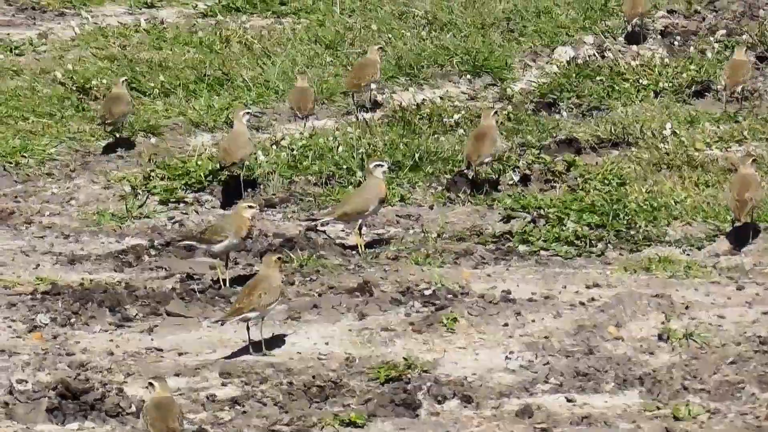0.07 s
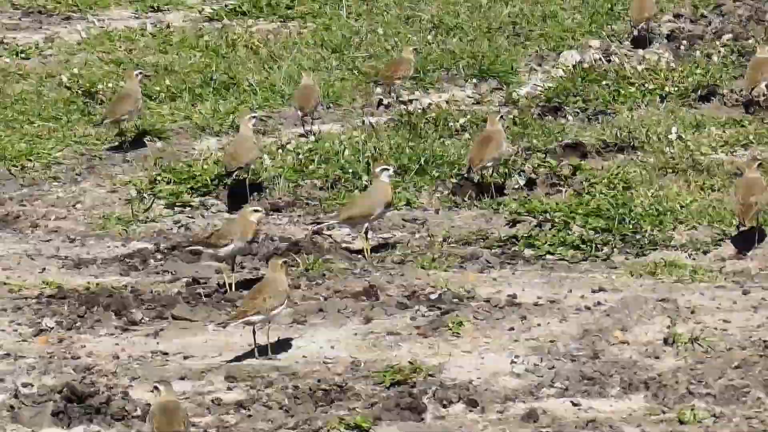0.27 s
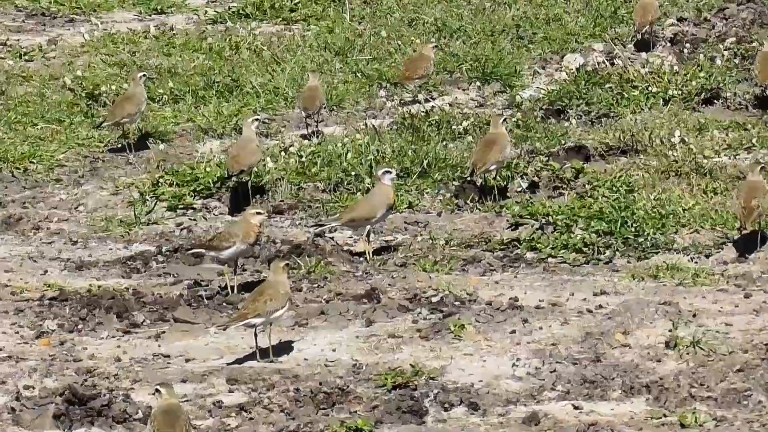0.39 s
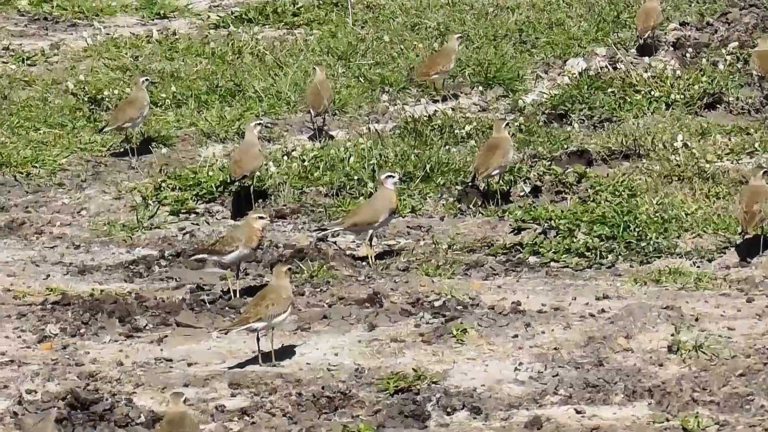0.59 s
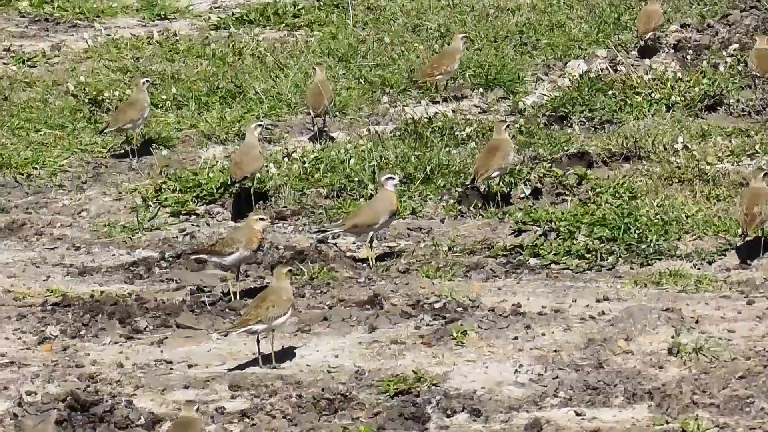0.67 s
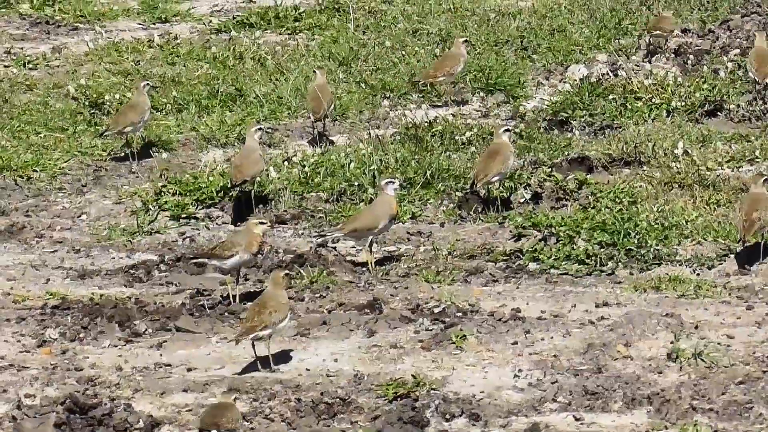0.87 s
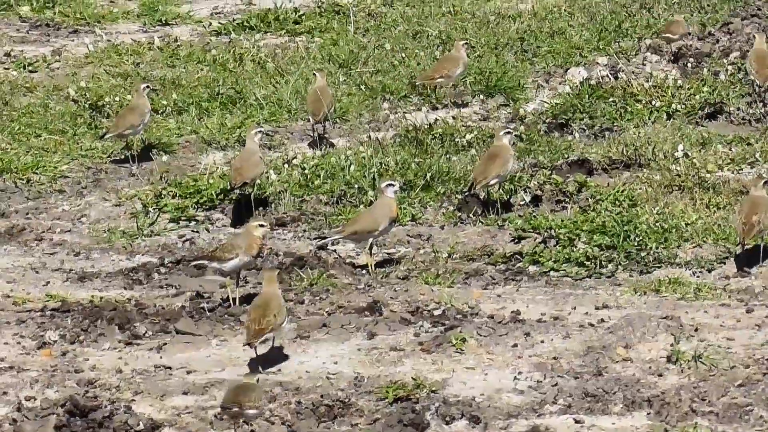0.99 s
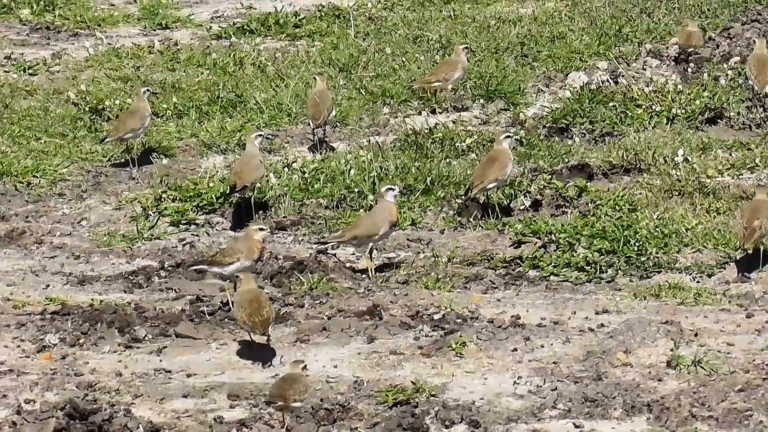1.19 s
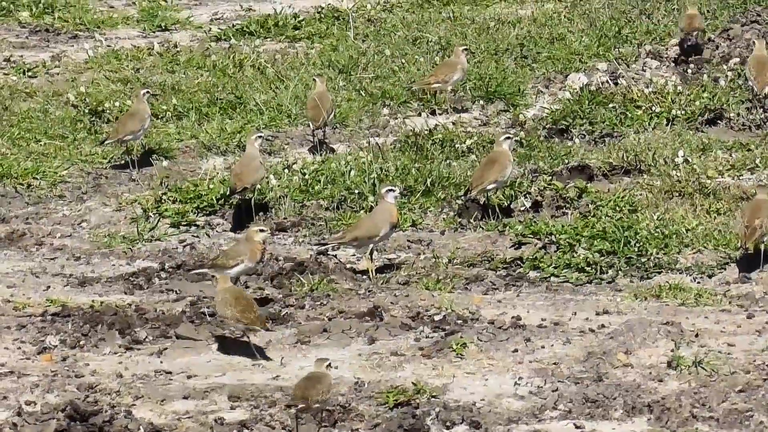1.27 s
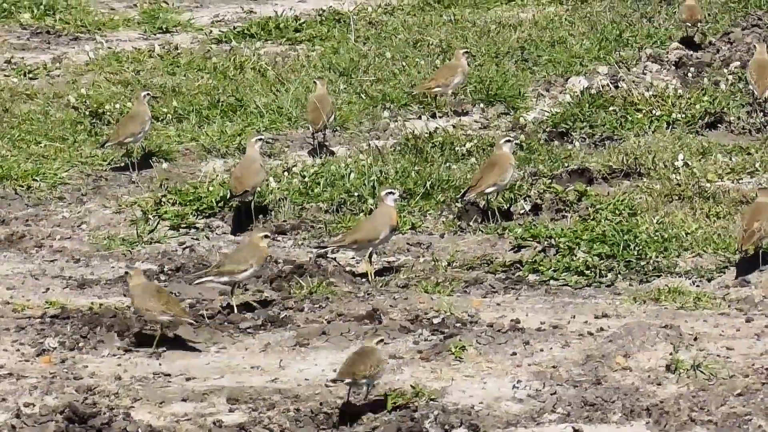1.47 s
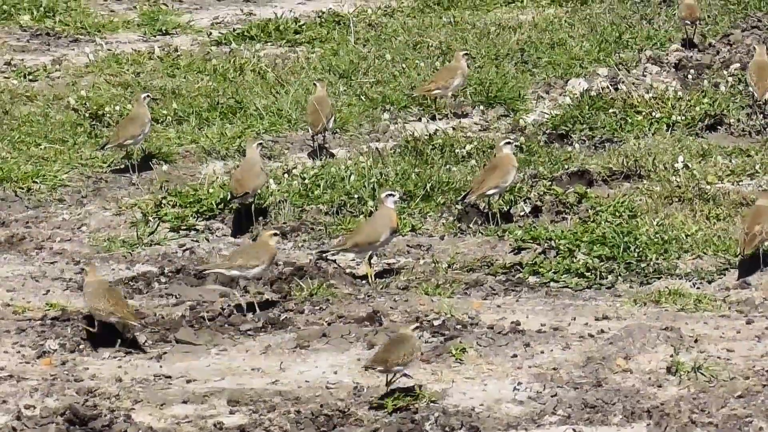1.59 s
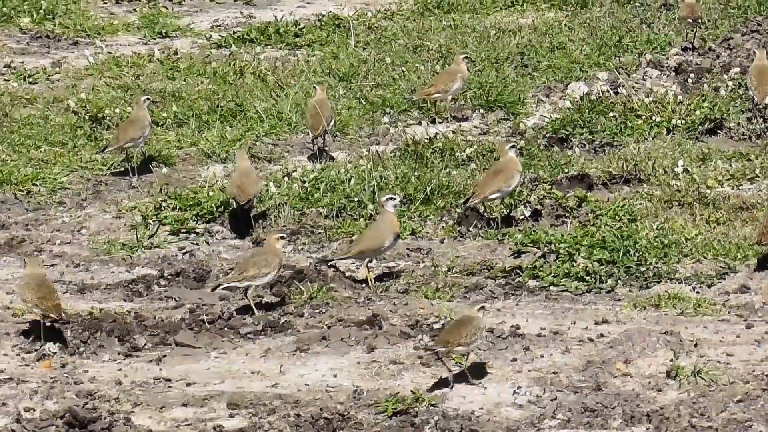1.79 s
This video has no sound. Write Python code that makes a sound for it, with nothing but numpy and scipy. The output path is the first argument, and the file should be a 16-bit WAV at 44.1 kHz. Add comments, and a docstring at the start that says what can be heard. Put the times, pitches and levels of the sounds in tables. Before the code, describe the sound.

A sharp, high warbled wader call, with faint whistles and low purring over soft outdoor air

```python
"""A flock of small waders on open stony ground, about 1.8 s, under a patchy rush of air (shaped noise). Thin
tones near 5 kHz slide from the very start and faint whistles follow (sliding sines), then a low distant purr
(sagging pulses) and grit ticks (noise bursts). A near bird soon gives the sharp warbled flock call (a tone with
overtones); light wind thumps the microphone of a small camera (damped low sines), and a second, farther bird
calls. The camera's housing colours the treble strongly."""
import sys
import numpy as np
from scipy import signal
from scipy.fft import rfft, irfft, next_fast_len
from scipy.io import wavfile
from scipy.ndimage import uniform_filter1d, map_coordinates

SR = 44100
rng = np.random.default_rng(int(sys.argv[2]) if len(sys.argv) > 2 else 0)


def magnitude_from_level(level_db):
    """Linear magnitude for a level in decibels (20 dB per decade)."""
    exponent = np.asarray(level_db, float) / 20
    return 10 ** exponent


def inscribe(sig):
    """Save sig as 16-bit PCM at rate SR to the path in sys.argv[1].

    A 1-D sig is mono; a 2-D sig holds one channel per row.
    Samples are clipped to [-1, 1] before scaling.
    """
    pcm = np.round(np.clip(np.atleast_2d(sig).T, -1, 1) * 32767)
    wavfile.write(sys.argv[1], SR, pcm.astype(np.int16))


N = 79380


def unit(x):
    """Scaled to rms 1."""
    return x / np.sqrt(np.mean(x ** 2) + 1e-20)


def along(points, hz):
    """(Hz, value) points read on a log frequency axis."""
    f, v = np.transpose(points)
    return np.interp(np.log(hz + 1), np.log(f + 1), v)


def wobble(rate_hz):
    """A smooth random curve, rate_hz knots a second."""
    knots = rng.standard_normal(int(N * rate_hz / SR) + 4)
    return map_coordinates(knots, [np.arange(N) * rate_hz / SR])


def coloured(x, points):
    """x through the causal minimum-phase filter with gain points (Hz, dB)."""
    m = 2 * next_fast_len(N // 2 + 4096)
    gain = magnitude_from_level(along(points, np.fft.rfftfreq(m, 1 / SR)))
    cepstrum = irfft(np.log(gain), m)
    cepstrum[1:m // 2] *= 2
    cepstrum[m // 2 + 1:] = 0
    return irfft(rfft(x, m) * np.exp(rfft(cepstrum)), m)[..., :N]


def pan(x, side_db):
    """Mono to a pair: the same in both channels, plus a share from the left."""
    return x * (1 + magnitude_from_level(side_db) * np.array([[1], [-1]]))


def echoes(x):
    """Quick scatter from stones nearby, then a long tail from the field: fading stereo noise."""
    # scattered echoes of the ground: hz, t60_s
    field_t60 = [(1000, 0.51), (5000, 0.52), (9000, 0.39), (14000, 0.12)]
    near_t60_s, far_share_db, rise_s = 0.075, -13.5, 0.0029
    alike = 0.83  # likeness of the two channels
    hz, t, z = signal.stft(rng.standard_normal((2, SR // 2)), SR, nperseg=128)
    near = magnitude_from_level(-60 * t / near_t60_s)
    far = magnitude_from_level(far_share_db - 60 * t / along(field_t60, hz)[:, None])
    fade = (near + far) * (1 - np.exp(-t / rise_s))
    a, b = signal.istft(z * fade, SR, nperseg=128)[1]
    turn = np.arccos(np.clip(alike, 0, 1)) / 2
    tail = np.cos(turn) * a + np.sin(turn) * np.outer([1, -1], b)
    late = np.pad(x, (90, 0))  # samples
    return signal.fftconvolve(late[None], tail / np.linalg.norm(a), axes=1)


def air():
    """Open-air rush: coloured noise, patchy in time and frequency, its sideways share set by band."""
    # spectrum shape: hz, gain_db
    spectrum = [(20, -57), (50, -9), (110, -1.5), (220, 1), (400, -5), (800, -6), (1400, -15), (3000, -17),
                (8000, -12.5), (16000, -16)]
    # level course before the lift below: time_s, level_db
    level_course = [(0.0, -55), (0.796, -59), (1.8, -55)]
    # sideways share: hz, share_db
    side_share = [(30, 0), (70, -8), (130, -25), (300, -7.5), (1200, -10.5), (3000, -13)]
    lift_db, patch_db = 6.5, [(200, 2.65), (4000, 2.8)]  # patch_db: hz, rms_db
    hz, t, z = signal.stft(rng.standard_normal((2, N)), SR, nperseg=512)
    patches = uniform_filter1d(rng.standard_normal(z.shape[1:]), size=5, axis=0)
    patches = unit(uniform_filter1d(patches, size=8, axis=1))
    front, side = z * magnitude_from_level(patches * along(patch_db, hz)[:, None])
    side = side * magnitude_from_level(along(side_share, hz))[:, None] + magnitude_from_level(-30.5) * front
    pair = signal.istft(np.array([front + side, front - side]), SR, nperseg=512)[1][:, :N]
    at_s, db = np.transpose(level_course)
    level_db = lift_db + np.interp(np.arange(N) / SR, at_s, db) + 0.52 * wobble(3.89)
    return magnitude_from_level(level_db) * unit(coloured(pair, spectrum))


def whistles():
    """Thin sliding tones, each a parabola of pitch, blurred by the field."""
    # thin tones near 5 kHz at the very start, then far whistles: start_s, length_s, level_db, start_hz,
    # middle_hz, end_hz
    slides = [(.001, 0.012, -44.5, 4800, 5340, 4800), (0.013, .016, -47.5, 4180, 4830, 6100),
              (0.032, 0.017, -50, 4470, 4400, 4100), (.050, 0.028, -49.5, 4280, 4500, 3900),
              (0.096, 0.012, -47, 4020, 5100, 5500), (0.101, 0.045, -51.5, 5290, 5400, 5050),
              (0.146, 0.024, -48, 4990, 4250, 2450), (0.641, 0.015, -51.5, 6470, 5800, 6500),
              (0.691, .010, -51.5, 3460, 2700, 3000), (0.756, 0.022, -48, 3820, 3880, 4050),
              (0.787, 0.013, -49, 2380, 2350, 2550), (0.299, 0.029, -50.5, 3068, 3360, 3900),
              (0.339, 0.064, -47, 4530, 3530, 2800), (0.397, 0.035, -51, 2874, 2980, 3340),
              (0.643, .016, -45.5, 4880, 4360, 3800), (0.674, 0.020, -39, 2880, 3760, 3800),
              (0.698, .017, -39.5, 5150, 4240, 3400), (0.713, .026, -38.5, 3880, 3100, 2850),
              (0.738, 0.025, -55, 2790, 2400, 1550), (0.827, 0.017, -52.5, 4040, 3900, 2760),
              (1.048, 0.03, -46, 4010, 3560, 2470), (1.094, 0.037, -56, 2375, 2650, 2140),
              (1.234, 0.031, -54, 3740, 3460, 2300), (1.404, .038, -57, 2890, 3500, 4500),
              (1.434, 0.115, -54.5, 4410, 3050, 2650), (1.53, .048, -55, 2680, 3040, 3100),
              (1.522, 0.015, -48.5, 5150, 5500, 6000), (1.553, 0.025, -55, 2460, 2550, 2400),
              (1.588, 0.085, -54, 3600, 3850, 4000), (1.643, 0.015, -44.5, 6230, 6200, 7300),
              (1.661, 0.011, -36.5, 5660, 6400, 7000), (1.689, 0.028, -47, 6870, 4160, 3800),
              (1.717, 0.012, -30.5, 6560, 5900, 4980), (1.722, 0.051, -50, 5150, 4950, 5400),
              (1.755, 0.0059, -28, 5640, 6640, 6900), (1.766, 0.012, -40, 8300, 8500, 7300)]
    edge = .22  # share of the length spent swelling, and again fading
    flutter, pitch_jitter, echo_db = .35, .012, -5  # first two: shares
    t, out = np.arange(N) / SR, np.zeros(N)
    jitter = 1 + pitch_jitter * wobble(300)
    for s, length, db, a, b, c in slides:
        i = slice(round(s * SR), round((s + length) * SR))
        u = (t[i] - s) / length
        hz = a * (1 - u) * (1 - 2 * u) + 4 * b * u * (1 - u) + c * u * (2 * u - 1)
        swell = np.sin(np.pi / 2 * np.clip(np.minimum(u, 1 - u) / edge, 0, 1))
        out[i] += magnitude_from_level(db) * swell * np.sin(2 * np.pi * np.cumsum(hz * jitter[i]) / SR)
    out = out * (1 + flutter * wobble(250))
    return pan(out, -18) + magnitude_from_level(echo_db) * echoes(out)[:, :N]


def purr():
    """Soft low Gaussian pulses at a nearly steady rate, each sagging in pitch."""
    # low purring: first_pulse_s, end_s, level_db, mid_pulse_pitch_hz
    runs = [(.052, .10, -44.5, 838), (.130, .20, -53, 786), (0.231, 0.437, -47, 828),
            (1.226, 1.326, -47, 800), (1.43, 1.50, -47.5, 772), (1.622, 1.80, -48.5, 827)]
    period_s, pulse_s, sag_hz_per_s = .0325, 0.0072, 12300  # pulse_s: centre to 1/e
    level_scatter_db, time_scatter_s, pitch_scatter = 1, .0015, 0.069
    out, t = np.zeros(N + SR), np.arange(-900, 900) / SR
    for first, last, db, hz in runs:
        chance = rng.standard_normal((12, 3))
        for s, (size, late, off) in zip(np.arange(first, last, period_s), chance):
            phase = 2 * np.pi * (hz * (1 + pitch_scatter * off) * t - sag_hz_per_s * t * t / 2)
            pulse = magnitude_from_level(db + level_scatter_db * size) * np.exp(-(t / pulse_s) ** 2) * np.sin(phase)
            out[round((s + time_scatter_s * late) * SR):][:len(t)] += pulse
    out = out[900:900 + N]  # pulses centred on their times
    return pan(out, -23) + magnitude_from_level(-5) * echoes(out)[:, :N]


def ticks():
    """Grit: each tick is a dull knock and a bright crack of noise, both starting at once and dying fast."""
    # grit ticks, levels before colouring and the lifts below: start_s, dull_level_db, bright_level_db
    hits = [(0.097, -43.5, -45), (0.583, -61, -40.5), (0.668, -54, -41), (0.7273, -38.5, -38),
            (0.7939, -37, -44), (0.7992, -59, -38.5), (0.8331, -41, -43.5), (0.9921, -40, -53),
            (1.0517, -53.5, -46), (1.0899, -40.5, -64), (1.4295, -41.5, -48), (1.6564, -40.5, -56),
            (1.743, -37.5, -35)]
    # knock spectrum: hz, gain_db
    dull_colour = [(250, -14), (700, 1), (1100, 1), (2200, -4), (3500, -35), (9000, -23)]
    # crack spectrum: hz, gain_db
    bright_colour = [(1500, -36), (5500, -1.5), (9000, -4), (16000, -1.5)]
    dull_t60_s, bright_t60_s = 0.018, 0.011
    dull, bright, t = np.zeros(N + SR), np.zeros(N + SR), np.arange(SR // 20) / SR
    for s, dull_db, bright_db in hits:
        a, b = rng.standard_normal((2, len(t)))
        dull[round(s * SR):][:len(t)] += magnitude_from_level(dull_db - 60 * t / dull_t60_s) * a
        bright[round(s * SR):][:len(t)] += magnitude_from_level(bright_db - 60 * t / bright_t60_s) * b
    both = magnitude_from_level(9) * coloured(dull[:N], dull_colour) + magnitude_from_level(8) * coloured(bright[:N], bright_colour)
    return both + magnitude_from_level(-3) * echoes(both)[:, :N]


def flock_calls():
    """One warbled tone with two overtones and breath, given by each bird; distance adds echo."""
    # flock call before stretch and pitch shift: time_s, pitch_hz, effort_db
    call = [(0, 5650, -9), (.0018, 5700, -3), (.0045, 5450, 6.5), (.0064, 5100, -2.5), (.008, 3600, -15.5),
            (.0092, 5300, -4), (.0118, 5700, -3), (.0128, 7000, -1.5), (.015, 8150, -9), (.0165, 7200, -3),
            (.019, 5250, -6), (.0225, 5600, -2.5), (.0238, 7200, -13), (.0262, 8500, -8),
            (.028, 7300, -5.5), (.0308, 5250, 3.5), (.0345, 5630, -10), (.036, 6700, 1),
            (.045, 5900, -11.5), (.055, 5200, -15), (.057, 5300, -44)]
    # who calls: start_s, level_db, time_stretch, overtone_gain_db, side_share_db, echo_over_direct_db
    callers = [(.230, -13, 1.0001, 0.9, -9, -9), (1.1135, -28, 1.2, -5.5, -8, 4)]
    # second and third partial at 0 dB effort, before the bird's overtone gain: level_db
    overtones_db = [-13.5, -32]
    overtone_growth = 0.19  # extra dB per dB of effort
    flutter_share, pitch_jitter, smooth_samples = .17, .018, 50
    breath_db = -26.5  # hiss of air through the bill, under the tone
    far_pitch_ratio = 1.045
    out, lead = np.zeros((2, N)), SR // 10
    t = np.arange(-lead, N) / SR
    window = np.hanning(smooth_samples)
    at_s, pitch_hz, effort_db = np.transpose(call)
    for bird, (s, db, stretch, overtone_db, side_db, echo_db) in enumerate(callers):
        u = (t - s) / stretch
        jitter = 1 + pitch_jitter * unit(np.convolve(rng.standard_normal(len(t)), window, 'same'))
        glide_hz = uniform_filter1d(np.interp(u, at_s, pitch_hz), size=30)
        hz = far_pitch_ratio ** bird * glide_hz * jitter
        effort = np.interp(u, at_s, effort_db, -150, -150)
        phase = 2 * np.pi * np.cumsum(hz) / SR
        tone = np.sin(phase)
        for k, partial_db in enumerate(overtones_db, start=2):
            gain = magnitude_from_level(partial_db + overtone_db + overtone_growth * effort)
            tone = tone + gain * np.sin(k * phase) * (k * hz < SR / 2)
        flutter = 1 + flutter_share * unit(np.convolve(rng.standard_normal(len(t)), window, 'same'))
        breath = magnitude_from_level(breath_db) * rng.standard_normal(len(t))
        voice = magnitude_from_level(db + effort) * (tone * flutter + breath)
        out += pan(voice[lead:], side_db) + magnitude_from_level(echo_db) * echoes(voice)[:, lead:lead + N]
    return out


def thumps():
    """Wind on the microphone ports: each thump one low push of a cycle or two."""
    # wind thumps, levels before the 7.5 dB cut below: start_s, level_db
    pushes = [(0.535, -34), (0.738, -40), (1.431, -34), (1.582, -34.5), (1.595, -34.5), (1.739, -38)]
    centre_hz, envelope_peak_s = 201.7, 0.0031
    out, t = np.zeros(N + SR), np.arange(SR // 20) / SR
    for s, db in pushes:
        hz = centre_hz * magnitude_from_level(rng.normal())
        envelope = t / envelope_peak_s * np.exp(1 - t / envelope_peak_s)
        out[round(s * SR):][:len(t)] += magnitude_from_level(db - 7.5) * envelope * np.sin(2 * np.pi * hz * t)
    return out[:N]


def scene():
    """All sources in the open field."""
    return air() + whistles() + purr() + ticks() + flock_calls() + thumps()


def roll_off(x):
    """The treble ends steeply here."""
    return signal.sosfilt(signal.butter(12, 16360, fs=SR, output="sos"), x)


def record(dry):
    """The housing colours front and side sound differently; the input stage rounds off peaks."""
    # camera housing, sound from the front: hz, gain_db
    front_colour = [(2500, 2.5), (4450, -4.5), (4850, 3), (5600, 2.5), (6400, -2), (7000, -14),
                    (7600, -16.5), (8200, -6), (9000, 3.5), (9800, 1), (11200, 3.5), (12400, -3.5),
                    (13200, 0), (14600, -8), (15600, -2.5), (16300, -50)]
    # sound from the side misses the housing's notch: hz, gain_db
    side_colour = [(2000, 2), (3200, -6), (4300, -2.5), (5500, 4), (7300, 3), (8500, 5.5), (10500, 8.5),
                   (12000, 0), (15600, -8), (16300, -47)]
    side_lag_s, ceiling, knee = .00002, 1, 5.6  # ceiling: amplitude; higher knee = harder
    front = coloured(dry.mean(0), front_colour)
    side = coloured((dry[0] - dry[1]) / 2, side_colour)
    lag = np.exp(-2j * np.pi * np.fft.rfftfreq(N, 1 / SR) * side_lag_s)
    side = irfft(rfft(side) * lag, N)
    pair = np.array([front + side, front - side])
    mix = pair / (1 + np.abs(pair / ceiling) ** knee) ** (1 / knee)
    return roll_off(mix)


dry = scene()
out = record(dry)
inscribe(out)
```